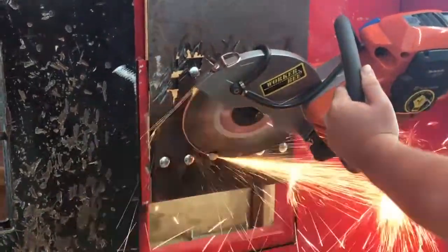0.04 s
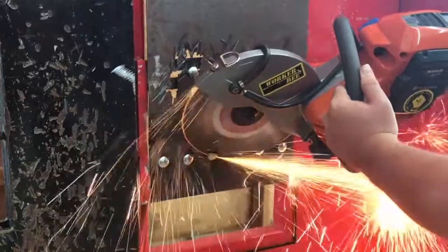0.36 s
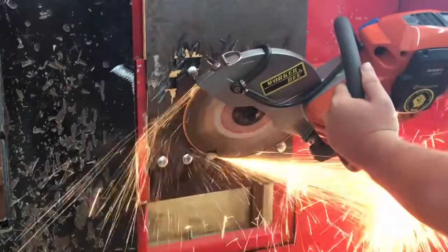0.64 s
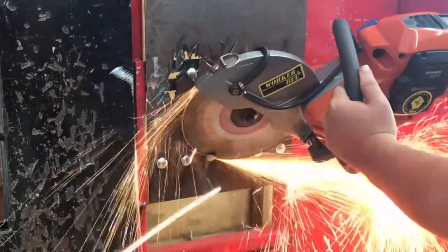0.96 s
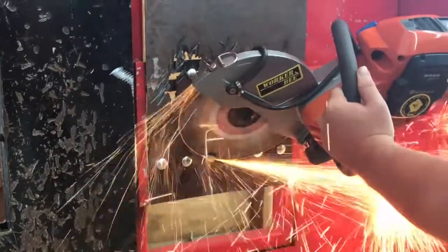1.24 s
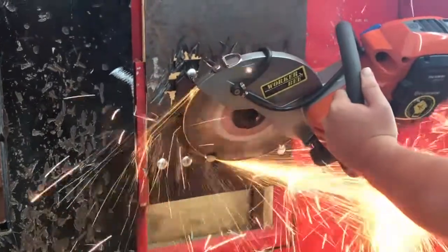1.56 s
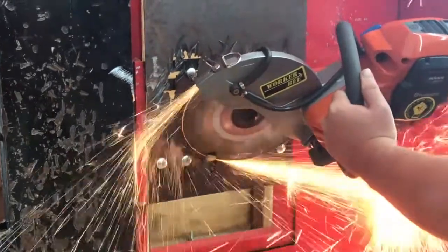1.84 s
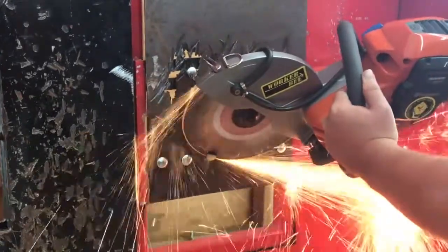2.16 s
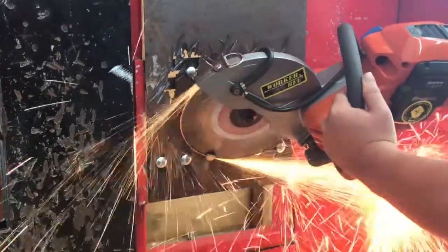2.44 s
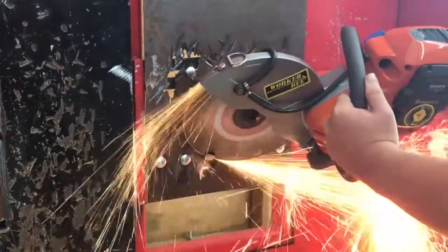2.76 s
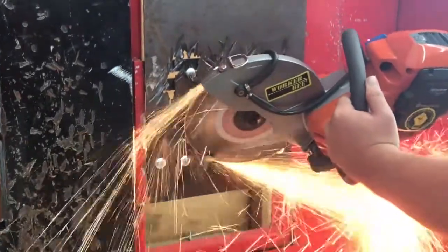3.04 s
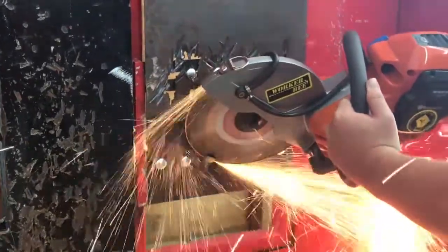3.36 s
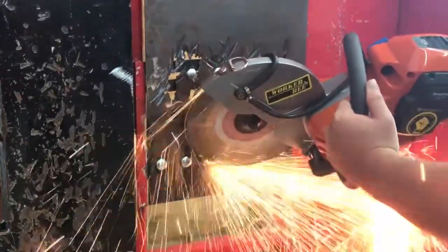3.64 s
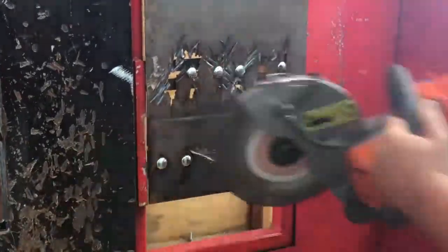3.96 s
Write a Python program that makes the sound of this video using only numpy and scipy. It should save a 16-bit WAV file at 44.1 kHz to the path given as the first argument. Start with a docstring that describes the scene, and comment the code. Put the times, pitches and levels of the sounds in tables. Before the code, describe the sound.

Close, harsh grinding of a cut-off saw on steel, with spark pops, dropping away at the end.

```python
"""A handheld cut-off saw grinds through a steel bolt, close to a mono microphone.
The gritty rim scrapes the steel in nearly the same pattern on every turn, so wheel and steel ring
and squeal over a buzz, while the shaken saw hums and drones underneath. Sparks pop against the
microphone. Near the end the wheel breaks through, runs free and grazes the cut as it is pulled away."""
import sys
import numpy as np
from scipy import signal
from scipy.fft import rfft, irfft
from scipy.io import wavfile
from scipy.ndimage import uniform_filter1d, map_coordinates

SR = 44100
rng = np.random.default_rng(int(sys.argv[2]) if len(sys.argv) > 2 else 0)


def bounce(signal):
    """Save signal as a 16-bit WAV file at the path given by the first command-line argument."""
    frames = np.transpose(np.atleast_2d(signal))
    limited = np.clip(frames, -1, 1)
    pcm = np.round(limited * 32767).astype(np.int16)
    wavfile.write(sys.argv[1], SR, pcm)


N = 176400
T, HZ = np.arange(N) / SR, np.fft.rfftfreq(N, 1 / SR)

# wheel speed (time [s], speed [turns/s])
WHEEL_SPEED = [(0, 81.6), (0.53, 85.8), (0.81, 87.4), (1.22, 88.4), (1.38, 86.3), (1.83, 86.7),
               (1.91, 87.4), (2.16, 87.6), (2.55, 85.1), (2.77, 85.5), (2.87, 84.8), (3.03, 86.4),
               (3.17, 84.7), (3.49, 84.3), (3.7, 85.4)]
# EQ of the free wheel's hiss (frequency [Hz], relative level [dB])
FREE_EQ = [(30, -24), (130, 5), (260, -7), (2900, -13.5), (4500, 6.5), (6500, -3.5), (11000, -28)]
# ringing modes of the free wheel (frequency [Hz])
FREE_MODES = [3430, 3850, 4410]
# fader of the hum at twice the wheel speed (time [s], level [dB])
SECOND_ORDER_FADER = [(0, -44.5), (.7, -58), (2.35, -58), (2.68, -42), (3.12, -49.5), (3.35, -42),
                      (3.72, -40), (3.95, -63.5)]
# fader of the hum at four times the wheel speed (time [s], level [dB])
FOURTH_ORDER_FADER = [(0, -46.5), (.6, -55.5), (1.3, -49.5), (1.87, -43), (1.99, -55), (2.08, -39.5),
                      (2.22, -58), (2.4, -40), (2.58, -56.5), (3.7, -49.5), (3.9, -68)]
# partials of the buzz (order [multiple of wheel speed], mean level [dB])
BUZZ_ORDERS = [(3, -59.5), (5, -58.5), (6, -56.5), (7, -50.5), (8, -51.5)]
# resonances of the saw's body (frequency [Hz], relative level [dB])
DRONE_MODES = [(1042, -4), (1118, 1), (1228, -1.5), (1300, 0), (1385, 1.5)]
# fader of the body drone (time [s], level [dB])
DRONE_FADER = [(0.0, -34.5), (0.22, -32), (0.48, -37.5), (0.72, -29), (0.94, -40), (1.3, -31),
               (1.54, -34.5), (2.02, -32), (2.86, -37.5), (3.04, -31.5), (3.2, -35.5), (3.74, -36),
               (3.86, -67)]
# light touches of the wheel (time [s], half length [s], frequency [Hz], half width [Hz], level [dB])
GRAZE_CUES = [(3.732, 0.022, 11000, 1200, -23), (3.983, 0.031, 4430, 129, -30)]
# sparks hitting the microphone (time [s], gain [dB])
SPARK_CUES = [(0.167, -30), (0.221, -24.5), (0.325, -26), (.337, -25), (0.381, -15), (0.494, -23.5),
              (.526, -19.5), (0.588, -24.5), (1.097, -24.5), (1.2, -35), (1.344, -24), (1.506, -30),
              (1.702, -16.5), (1.73, -23.5), (1.825, -35), (2.005, -30.5), (2.231, -22.5), (2.785, -28.5),
              (2.817, -28), (2.85, -20.5), (3.126, -27.5), (3.345, -23), (3.362, -29), (3.399, -31)]
# squeals of the steel (time [s], half length [s], pitch [Hz], level [dB])
SQUEAL_CUES = [(0.27, 0.37, 5180, -31), (0.943, 0.11, 5190, -23), (1.335, 0.023, 6040, -24),
               (1.373, 0.026, 5185, -21), (1.485, 0.044, 5790, -22), (1.498, 0.039, 5180, -24),
               (1.717, 0.027, 5190, -21), (2.58, 0.064, 5830, -23.5), (3.006, 0.015, 4486, -22),
               (3.607, 0.057, 5800, -25.5), (3.807, 0.029, 4440, -25.5), (3.967, 0.024, 4290, -30.5)]
# EQ of the lower rasp (frequency [Hz], relative level [dB])
RASP_EQ = [(40, -29), (200, -17), (1100, -8.5), (2450, -8), (2850, -0.5), (3700, 3), (4500, -1.5),
           (4900, -9), (7000, -21.5)]
# fader of the lower rasp (time [s], level [dB])
RASP_FADER = [(0.0, -26), (0.7, -26), (1.15, -29.5), (1.33, -25.5), (2.75, -25), (3.3, -26), (3.76, -26.5),
              (3.86, -42)]
# EQ of the grinding hiss (frequency [Hz], relative level [dB])
HISS_EQ = [(4000, -18), (5600, 1), (9900, 1.5), (10400, -8.5), (11000, -4.5), (13900, -3), (14300, -15),
           (14700, -6.5)]
# modes of wheel and steel (frequency [Hz], half width [Hz], relative level [dB])
CUT_MODES = [(4004, 180, -10), (4460, 45, -5), (5180, 48, -4), (5778, 34, 0), (6020, 41, -4),
             (6546, 128, -6), (7104, 92, -2), (8010, 34, -8.5), (8530, 91, -6.5), (9230, 64, -7),
             (9745, 59, -6.5), (11080, 180, -9.5), (12040, 67, -10), (12850, 40, -9.5), (13280, 46, -6.5),
             (15400, 93, -13)]
# how hard the wheel bites: the group fader of hiss and ring (time [s], gain [dB])
BITE_FADER = [(0.0, -20.5), (0.62, -19.5), (0.9, -22), (1.38, -20), (1.54, -21.5), (1.6, -19), (1.76, -21),
              (1.84, -19), (1.9, -23.5), (2.02, -20), (2.08, -22.5), (2.18, -18.5), (2.33, -22),
              (2.46, -19), (2.63, -23.5), (2.74, -19.5), (2.84, -18.5), (2.95, -25.5), (3.02, -20),
              (3.16, -19.5), (3.22, -23.5), (3.3, -21.5), (3.38, -17.5), (3.45, -23.5), (3.58, -26),
              (3.76, -20), (3.82, -41.5), (3.86, -52)]

CUT_END_S, BUZZ_RELEASE_DB_PER_S = 3.76, 178
RASP_MEMORY, HISS_MEMORY, BODY_MEMORY = 0.871, 0.67, 0.94  # likeness of the rim from turn to turn
FRESH_SHARE = 0.14  # grit that never repeats
RUNOUT_DB, GRAIN_DB = -1.1, 2  # uneven contact over a turn, and from grain to grain
SHIMMER_HZ = 25.5  # how fast rings and squeals waver


def amp(db):
    """Decibels to gain."""
    return 10 ** (np.asarray(db) / 20)


def unit(x):
    """Scales to rms 1."""
    return x / np.sqrt(np.mean(x ** 2) + 1e-20)


def curve(rows):
    """An automation lane: breakpoints joined by straight lines in time."""
    return np.interp(T, *np.transpose(rows))


def swell(time_s, half_length_s):
    """A bell-shaped fade in and out."""
    return np.exp(-((T - time_s) / half_length_s) ** 2)


def equalise(x, points):
    """Shapes a sound with a broad EQ curve, at rms 1."""
    hz, db = np.transpose(points)
    gain = amp(np.interp(np.log(HZ + 1), np.log(hz), db))
    return unit(irfft(rfft(x) * gain, N))


def resonate(spectrum, hz, half_width_hz):
    """The sound of one steep resonance driven by a spectrum."""
    return irfft(spectrum / (1 + 1j * (HZ - hz) / half_width_hz) ** 2, N)


def wander(rate_hz, size=800):
    """Slow random drift of rms about 1."""
    hz = np.fft.rfftfreq(size, N / SR / size)
    spectrum = rfft(rng.standard_normal(size)) * (hz > 0) / (1 + (hz / rate_hz) ** 4)
    return np.interp(T, np.linspace(0, N / SR, size), unit(irfft(spectrum)))


def fine_ring(x, share=0.55, t60_s=0.056):
    """The many weak modes of wheel and guard add a short, dense ring that combs the treble."""
    t = np.arange(SR // 5) / SR
    tail = rng.standard_normal(len(t)) * np.exp(-np.log(1000) * t / t60_s)
    tail = signal.lfilter(*signal.butter(2, 2000, "high", fs=SR), tail)
    wet = signal.fftconvolve(x, tail / np.linalg.norm(tail))[:N]
    return np.sqrt(1 - share) * x + np.sqrt(share) * wet


def grit(turns, memory, grains_per_turn=512, turn_count=400):
    """Force of the rim on the steel: a rough ring of grains that wears a little on each turn."""
    noise = rng.standard_normal((2, turn_count, grains_per_turn))
    rim = signal.lfilter([np.sqrt(1 - memory ** 2)], [1, -memory], noise, axis=1)
    grains, lumps = rim[:, ::-1].reshape(2, -1)
    surface = grains * amp(GRAIN_DB * unit(uniform_filter1d(lumps, size=40)))
    scrape = unit(map_coordinates(surface, [turns * grains_per_turn], order=3, mode="wrap"))
    force = np.sqrt(1 - FRESH_SHARE) * scrape + np.sqrt(FRESH_SHARE) * rng.standard_normal(N)
    return force * amp(RUNOUT_DB * np.cos(2 * np.pi * turns))


def free_wheel(hiss_db=-36, ring_db=-42, fade_in_s=0.056):
    """Out of the cut the wheel hisses and its modes sing on."""
    out_of_cut = np.clip((T - CUT_END_S) / fade_in_s, 0, 1)
    air = rng.standard_normal(N)
    ring = unit(sum(resonate(rfft(air), hz, half_width_hz=20) for hz in FREE_MODES))
    hiss = equalise(fine_ring(air), FREE_EQ)
    return out_of_cut * (amp(hiss_db) * hiss + amp(ring_db) * ring)


def hum(turns, third_db=-10, waver_db=4):
    """The loaded wheel shakes the saw at multiples of its speed: a low hum and a wavering buzz."""
    def tone(order):
        return np.sqrt(2) * np.cos(2 * np.pi * (order * turns + rng.random()))
    low = amp(curve(SECOND_ORDER_FADER)) * (tone(2) + amp(third_db) * tone(3))
    low += amp(curve(FOURTH_ORDER_FADER)) * tone(4)
    buzz = sum(amp(db + waver_db * wander(rate_hz=6.6)) * tone(order) for order, db in BUZZ_ORDERS)
    release = amp(-BUZZ_RELEASE_DB_PER_S * np.maximum(T - CUT_END_S, 0))
    return low + buzz * release


def drone(turns):
    """The rim shakes the saw's body; partials flare and break up as they slide through its modes."""
    force = rfft(grit(turns, BODY_MEMORY))
    body = sum(amp(db) * resonate(force, hz, half_width_hz=18.5) for hz, db in DRONE_MODES)
    running_rms = np.sqrt(uniform_filter1d(body ** 2, size=4000))
    return amp(curve(DRONE_FADER)) * body / running_rms


def grazes():
    """The wheel zings through the last sliver, then brushes the cut so the steel rings briefly."""
    out = np.zeros(N)
    for time_s, half_length_s, hz, half_width_hz, db in GRAZE_CUES:
        ring = unit(resonate(rfft(rng.standard_normal(N)), hz, half_width_hz))
        out += amp(db) * swell(time_s, half_length_s) * ring
    return out


def spark_pops(thud_hz=45.6, drop_hz=995, length_spread=0.33):
    """Each spark on the microphone makes a pop that dives into a low thud."""
    rise_s, drop_s, decay_s = 0.001, 0.00159, 0.011  # at pace 1; each pop runs at its own pace
    out, t = np.zeros(N), np.arange(SR // 10) / SR
    for time_s, db in SPARK_CUES:
        pace = np.exp(length_spread * (2 * rng.random() - 1))
        age = t * pace
        hz = thud_hz + drop_hz / (1 + (age / drop_s) ** 2)
        envelope = (1 - np.exp(-age / rise_s)) * np.exp(-age / decay_s)
        pop = envelope * np.sin(2 * np.pi * np.cumsum(hz) / SR)
        slot = out[round(time_s * SR):][:len(t)]
        slot += amp(db) * pop[:len(slot)]
    return out


def squeals(turns, jitter_hz=9.4, flicker_db=-0.5, flutter_depth=0.24):
    """One mode of the steel takes over, flickering with the contact and fluttering with each turn."""
    drift_hz = jitter_hz * wander(SHIMMER_HZ)
    flicker = amp(flicker_db * wander(SHIMMER_HZ))
    flutter = 1 + flutter_depth * np.cos(2 * np.pi * turns)
    out = np.zeros(N)
    for time_s, half_length_s, hz, db in SQUEAL_CUES:
        tone = np.sqrt(2) * np.sin(2 * np.pi * np.cumsum(hz + drift_hz) / SR)
        out += amp(db) * swell(time_s, half_length_s) * tone
    return flicker * flutter * out


def grinding(turns, hiss_trim_db=-2.5, ring_trim_db=-1, shimmer_db=1.5, throb_db=1, judder_db=0.5):
    """The rim scrapes the bolt: a rasp, a bright hiss and the ring of wheel and steel."""
    rasp = equalise(fine_ring(grit(turns, RASP_MEMORY)), RASP_EQ)
    hiss = equalise(fine_ring(grit(turns, HISS_MEMORY)), HISS_EQ)
    force = rfft(grit(turns, HISS_MEMORY))
    ring = np.zeros(N)
    for hz, half_width_hz, db in CUT_MODES:
        # each mode throbs once per turn, at its own point of the turn
        throb = np.cos(2 * np.pi * (turns + rng.random()) + wander(SHIMMER_HZ))
        gain = amp(db + shimmer_db * wander(SHIMMER_HZ) + throb_db * throb)
        ring += gain * resonate(force, hz, half_width_hz)
    bite = amp(hiss_trim_db) * hiss + amp(ring_trim_db) * unit(ring)
    judder = amp(judder_db * wander(rate_hz=21))  # the hand's unsteady pressure
    return judder * (amp(curve(RASP_FADER)) * rasp + amp(curve(BITE_FADER)) * bite)


def scene():
    """The mix: the saw and its sparks, the same in both channels."""
    turns = np.cumsum(curve(WHEEL_SPEED)) / SR
    saw = grinding(turns) + squeals(turns) + hum(turns) + drone(turns)
    mono = saw + spark_pops() + free_wheel() + grazes()
    return np.array([mono, mono])


def record(dry, cutoff_hz=15780):
    """A steep high cut on the master."""
    high_cut = signal.firwin(511, cutoff_hz, window=("kaiser", 9), fs=SR)
    return signal.oaconvolve(dry, high_cut[None], "same")


dry = scene()
out = record(dry)
bounce(out)
```